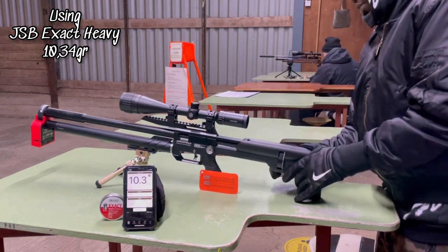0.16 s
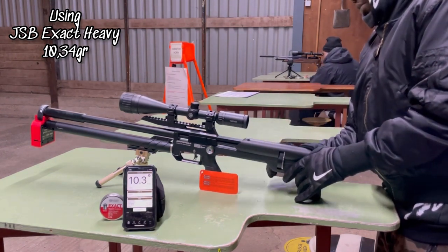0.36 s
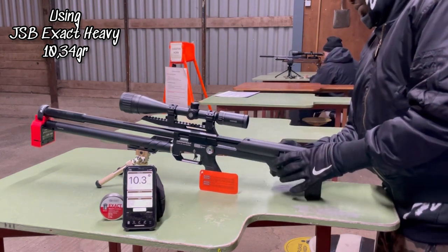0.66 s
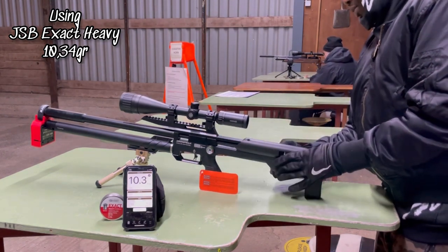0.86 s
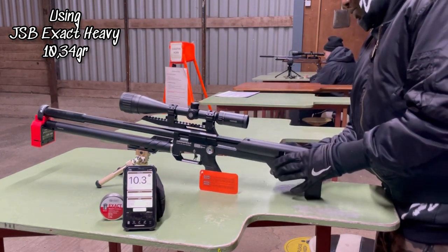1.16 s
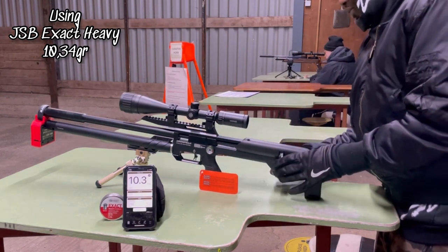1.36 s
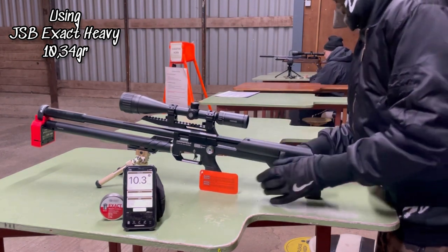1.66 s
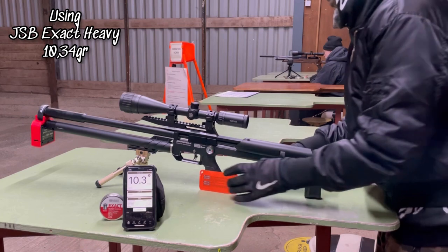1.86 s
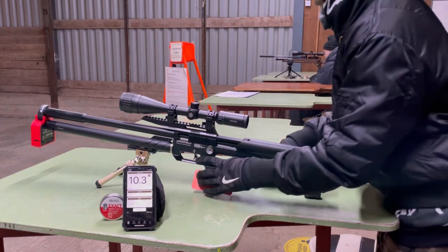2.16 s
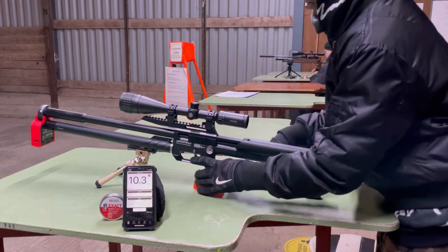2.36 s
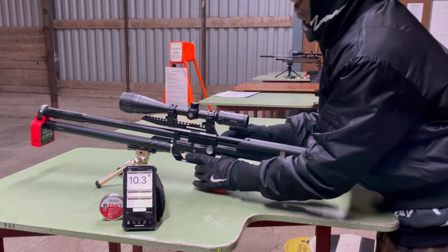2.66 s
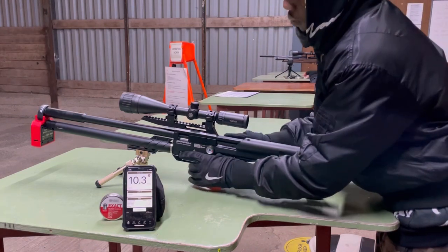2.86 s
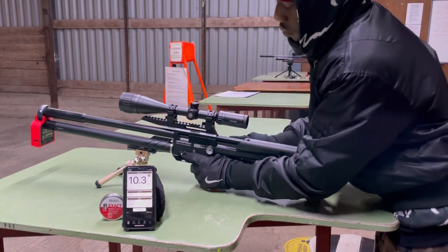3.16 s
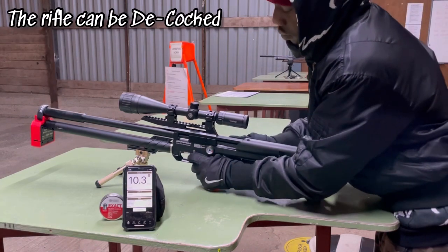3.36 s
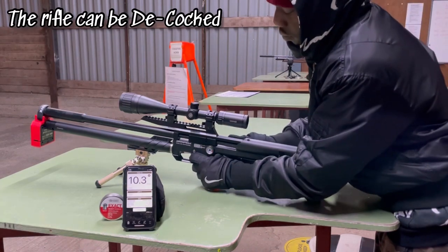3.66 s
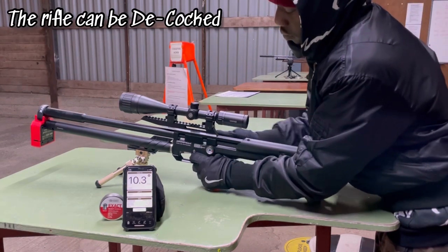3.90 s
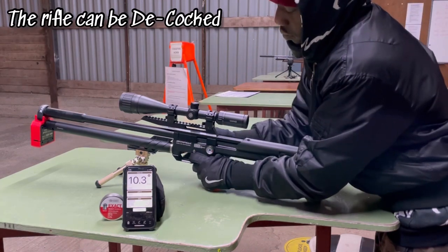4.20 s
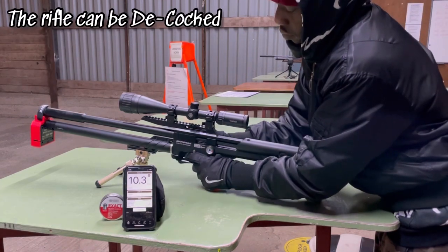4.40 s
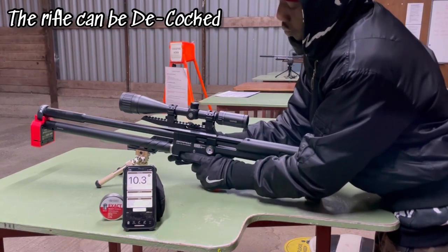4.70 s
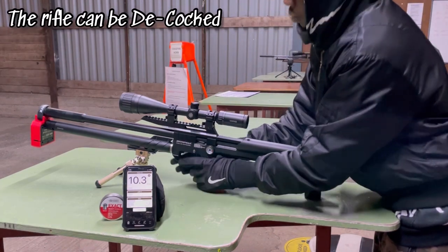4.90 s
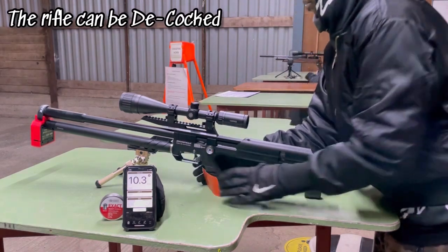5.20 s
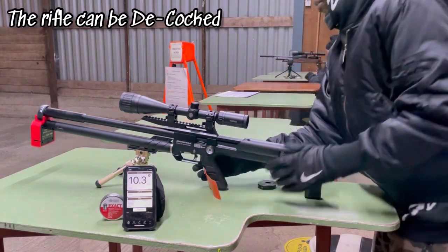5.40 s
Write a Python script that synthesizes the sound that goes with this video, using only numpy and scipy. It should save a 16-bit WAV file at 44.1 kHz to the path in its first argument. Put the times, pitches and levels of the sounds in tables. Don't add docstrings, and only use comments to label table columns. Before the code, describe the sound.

Close stereo recording at a bench in a large sheet-metal shed. Rifle parts click, knock and scrape quietly, then one far louder, bright, sharp bang cracks and rings through the hall. As its echo fades, cloth swishes and rustles, a tiny rubbery squeak slips by, and a few crisp metal knocks finish over a faint low rumble.

```python
import sys
import numpy as np
from scipy import signal
from scipy.fft import rfft, irfft, next_fast_len
from scipy.io import wavfile
from scipy.ndimage import uniform_filter1d

SR = 44100
rng = np.random.default_rng(int(sys.argv[2]) if len(sys.argv) > 2 else 0)


def int16_out(signal):
    q = np.round(np.clip(np.atleast_2d(signal).T, -1, 1) * 32767)
    wavfile.write(sys.argv[1], SR, q.astype(np.int16))


def convert_level_to_amplitude(level_db):
    exponent = np.asarray(level_db, float) / 20
    return 10 ** exponent


N = 244478

# frequency in Hz, level in dB.
STRIKE_COLOUR = [(150, -15.5), (400, -1.5), (1000, -1), (2000, 1.5), (4000, 8.5), (6500, -6.5), (9000, 1),
                 (13000, 10), (16000, -7)]


def at_hz(points, hz):
    freqs, values = np.array(points).T[:2]
    return np.interp(np.log(hz), np.log(freqs), values)


def rms_one(x):
    return x / np.sqrt(np.mean(x ** 2) + 1e-20)


def drift(rate, size=N):
    knots = rng.standard_normal(int(size / SR * 40) + 2)
    return np.interp(np.arange(size) / SR * rate, np.arange(len(knots)), knots)


def swells(rows):
    t = np.arange(0, N + 32, 32) / SR
    gain = 0
    for peak_s, db, rise_s, fall_s in rows:
        away = np.maximum((peak_s - t) / rise_s, (t - peak_s) / fall_s)
        gain = gain + convert_level_to_amplitude(db - 20 * away)
    return np.interp(np.arange(N) / SR, t, gain)


def coloured(spectrum, patchy_db, rate):
    size = next_fast_len(N)
    hz = np.maximum(np.arange(size // 2 + 1) * SR / size, 1)
    inside = (hz > spectrum[0][0]) & (hz < spectrum[-1][0])
    white = rfft(rng.standard_normal((2, size)))
    noise = irfft(white * convert_level_to_amplitude(at_hz(spectrum, hz)) * inside, size)[:, :N]
    return rms_one(noise * convert_level_to_amplitude(patchy_db * drift(rate)))


def blows(rows, strike, cycles, crack_s, spread_db, snap_db, pan_db, upper_db, upper_follows):
    near, send = np.zeros((2, N)), np.zeros(N)
    t = np.arange(2048) / SR
    grid = np.geomspace(160, 15500, 100)
    bins = np.maximum(np.arange(129) * SR / 256, 1)
    unlike_db = -7
    pan = (convert_level_to_amplitude(pan_db / 2) - convert_level_to_amplitude(-pan_db / 2)) / 2
    for s, peak_db, low_db, high_db, send_db in rows:
        at = round(s * SR)
        edge_db = upper_db + upper_follows * high_db
        tilt = [(550, low_db), (1100, 0), (2200, 0.0046), (3300, edge_db), (5000, edge_db), (7500, high_db)]
        hz = (grid * np.exp(rng.normal(0, .02, 100)))[:, None]
        decay = np.exp(np.float32(-np.log(1000) * t / (cycles / hz + crack_s)))
        ring = decay * (1 - np.exp(-t / .00015))
        scatter_db = spread_db * rng.standard_normal((2, 100, 1))
        strengths = convert_level_to_amplitude(at_hz(tilt, hz) + at_hz(strike, hz) + scatter_db)
        phase = 2 * np.pi * (hz * t + 0.59 * rng.random((2, 100, 1)))
        modes = strengths * ring * np.sin(np.float32(phase))
        shared, own = convert_level_to_amplitude(peak_db - 14) * modes.sum(axis=1)
        near[:, at:at + len(t)] += [shared, convert_level_to_amplitude(unlike_db) * own + pan * shared]
        spectrum = convert_level_to_amplitude(at_hz(tilt, bins) + at_hz(strike, bins)) / np.sqrt(bins / 2000 + .1)
        click = np.roll(irfft(spectrum), 128)
        near[0, at - 100:at + 156] += convert_level_to_amplitude(peak_db + snap_db) * click / np.abs(click).max()
        send[at:at + 256] += convert_level_to_amplitude(peak_db + send_db + 15) * click
    body = signal.butter(2, 260, "high", fs=SR, output="sos")
    return signal.sosfilt(body, near), send


def bang():
    # start in seconds, peak in dB, lows and highs in dB re peak, hall send in dB.
    shots = [
        (2.3016, -6.5, -16, 0, 2.5),
        (2.3053, -11, -22.5, -8, -30),
        (2.309, -16, -8, -12, -31),
        (2.5575, -29, -13, -17, -6),
    ]
    # frequency in Hz, level in dB.
    bang_colour = [(150, -6), (400, -4), (1000, -2.84), (2000, -0.6), (4000, -0.3), (6500, -10),
                   (9000, -7.5), (13000, 5.5), (16000, -17)]
    return blows(shots, bang_colour, cycles=6.2, crack_s=0.01, spread_db=1.0, snap_db=5.0,
                 pan_db=-4.5, upper_db=0.5, upper_follows=0.75)


def knocks():
    # start in seconds, peak in dB, lows and highs in dB re peak, hall send in dB.
    hits = [(0.2507, -28, -13.5, 4.5, -6), (0.2713, -35, -3.5, -3, 1.5), (0.8714, -43, -23, -20, 1),
            (0.8824, -47, -4, -36, -3), (1.5702, -31.5, -4, -8, 0.5), (1.5753, -41, -1.5, -43, 11.5),
            (1.7423, -53.5, 4, -33, 11.5), (1.7941, -45, -8, -30, -9), (3.2912, -42, 3, -10, -1.5),
            (4.579, -29, -12.5, 5.5, -1), (4.5839, -48, 4.5, -6, -0.5), (4.9172, -40, -4, -18, -13),
            (4.9226, -24, -8, -13, -4), (4.9305, -35.5, -2, -45, -12), (5.014, -35.5, -16.5, -28, -23.5),
            (5.0214, -38.5, -18, -31, 3.5), (5.0659, -45.5, -11.5, -28, -10.5)]
    return blows(hits, STRIKE_COLOUR, cycles=17.0, crack_s=0.0088, spread_db=3.5, snap_db=6,
                 pan_db=-3.0, upper_db=-5.0, upper_follows=0.46)


def ticks():
    # start in seconds, peak in dB, lows and highs in dB re peak, hall send in dB.
    taps = [(0.7083, -46.5, -28, -20, -3), (1.2141, -56, -13, -34, 16), (1.27, -52, -42, -17, -2),
            (1.4352, -65, 4, -1, 3), (1.4536, -58.5, -7, 5, -3), (1.4724, -58.5, -17, 0, -11),
            (1.4887, -60.5, -22, 5.5, 6.5), (1.5024, -66.5, -10, -8, -7), (3.1375, -45.5, -19.5, -22, 3),
            (3.7653, -55, -13.5, -11, -12), (3.7901, -54, -4.5, -27.5, 1), (4.0492, -63, 5, -22, -2),
            (4.0996, -52, -20, -13, -1), (4.1103, -58.5, -6, -14, 0), (4.8945, -53, -17.5, -22, 16),
            (5.3692, -56, -18, -3, 7.5)]
    return blows(taps, STRIKE_COLOUR, cycles=6.3, crack_s=0.017, spread_db=2.5, snap_db=-1,
                 pan_db=-4.0, upper_db=-4.0, upper_follows=.12)


def ringing():
    # start in seconds, peak in dB.
    struck = [
        (0.2507, -19.5),
        (1.569, -25),
        (2.302, -3.5),
        (4.5788, -13),
        (4.9226, -18.5),
    ]
    # frequency in Hz, level in dB, T60 in seconds.
    part_modes = [
        [(638, 13.5, 0.052), (1460, -8, 0.11), (2740, 5, 0.012), (3480, -30, 0.0033)],
        [(330, -4, 0.17), (1102, 5.5, 0.22), (1306, 2, 0.1), (5044, -36, 0.21), (6100, -13, 0.19)],
        [(1304, -9, 0.078), (2360, 5.5, 0.016), (3900, 2, 0.045), (5750, -15, 0.0061)],
        [(1920, -16.5, 0.019), (3140, -10, 5.0), (3630, 9, 0.016), (5210, -7, 0.006)],
        [(2000, -11, 0.09), (1424, -5, 0.056), (2686, -15, 0.048), (3510, -14, 0.043)],
    ]
    out, t = np.zeros(N), np.arange(4096) / SR
    for (s, peak_db), modes in zip(struck, part_modes):
        top_db = max(db for hz, db, t60 in modes)
        at = round(s * SR)
        for hz, db, t60 in modes:
            level_db = peak_db - 14.5 + db - top_db - 60 * t / np.clip(t60, .008, .09)
            out[at:at + len(t)] += convert_level_to_amplitude(level_db) * np.sin(2 * np.pi * hz * t)
    return out


def thump():
    # start in seconds, level in dB, frequency in Hz, T60 in seconds.
    booms = [
        (2.313, -38.5, 103.4, 0.21),
        (2.33, -46, 190.2, 0.25),
        (4.62, -44.5, 103.1, 0.22),
    ]
    out, t = np.zeros(N), np.arange(SR // 2) / SR
    for s, db, hz, t60 in booms:
        envelope = convert_level_to_amplitude(db - 60 * t / t60) * (1 - np.exp(-t / 0.011))
        out[round(s * SR):][:len(t)] += envelope * np.sin(2 * np.pi * hz * t)
    return out


def squeak():
    # time in seconds, pitch in Hz, level in dB.
    glide = [
        (3.785, 671, -70),
        (3.826, 640, -55.5),
        (3.855, 791, -55),
        (3.876, 793, -71),
        (3.9, 725, -71),
    ]
    # multiple of the pitch, level in dB.
    orders = [(1, -1.4), (2, -2.5), (3, -39), (4, -15)]
    s, pitch, level = np.transpose(glide)
    s = [s[0] - .015, *s, s[-1] + 0.013]
    t = np.arange(N) / SR
    hz = np.interp(t, s, [pitch[0], *pitch, pitch[-1]])
    level_db = np.interp(t, s, [-90, *level, -90])
    jitter, flutter = rms_one(uniform_filter1d(rng.standard_normal((2, N)), size=120))
    turns = np.cumsum(hz * (1 + .09 * jitter)) / SR
    wave = sum(convert_level_to_amplitude(db) * np.sin(2 * np.pi * k * turns) for k, db in orders)
    return convert_level_to_amplitude(level_db + 3.5 + 3.3 * flutter) * wave


def scrape(stroke, modes):
    size, out = 32768, np.zeros(N + 32768)
    catches_per_s = 980 * convert_level_to_amplitude(3.0 * drift(38, size))
    catches = rng.standard_normal(size) * (rng.random(size) < catches_per_s / SR)
    part = 0
    for hz, width_hz, db in modes:
        r = np.exp(-np.pi * (2.5 * width_hz + 260) / SR)
        zeros = [(1 - r * r) / 2, 0, (r * r - 1) / 2]
        poles = [1, -2 * r * np.cos(2 * np.pi * hz / SR), r * r]
        once = signal.lfilter(zeros, poles, catches)
        twice = signal.lfilter(zeros, poles, once)
        part = part + convert_level_to_amplitude(db) * (rms_one(twice) + .3 * rms_one(once))
    at = round(stroke[0][0] * SR) - size // 3
    out[at:at + size] = rms_one(part)
    return swells(stroke) * out[:N]


def scrapes():
    # peak in seconds, peak in dB, last 20 dB of rise and first
    # 20 dB of fall in seconds.
    strokes = [
        [(0.853, -62, 0.013, 0.027), (0.876, -53.5, 0.013, 0.022)],
        [(1.21, -62.5, .05, 0.069), (1.268, -51.5, 0.057, 0.07)],
        [(3.852, -57.5, .14, 0.078), (3.94, -61, .1, .11)],
        [(5.236, -56.5, .04, .1), (5.32, -64.5, .03, .06)],
    ]
    # frequency in Hz, width in Hz, level in dB.
    part_modes = [
        [(640, 22, -9.5), (1750, 67, -2.5), (2440, 32, -5), (3100, 55, -5.5), (4500, 130, -5.5)],
        [(1480, 49, 2), (1840, 16, 1.5), (1950, 47, 2.5), (2320, 110, 6.5), (3920, 52, -2.5), (4630, 39, -19)],
        [(1408, 47, 5), (2480, 32, -12.5), (3330, 200, -10), (4040, 200, -13)],
        [(1850, 55, 0), (2400, 250, 5), (3300, 250, 0), (3220, 53, -16), (4150, 47, -26.5)],
    ]
    return sum(scrape(stroke, modes) for stroke, modes in zip(strokes, part_modes))


def sleeve_swish():
    # peak in seconds, peak in dB, last 20 dB of rise and first 20 dB of fall in seconds.
    drags = [
        (2.79, -55, .008, 0.23),
        (2.94, -62, .3, 0.18),
    ]
    # frequency in Hz, level in dB per Hz.
    swish_colour = [(1200, -7), (2500, 1.5), (5000, -7.5), (8500, -3.2), (11000, -3.5), (13000, -9),
                    (15000, -19.5)]
    return swells(drags) * coloured(swish_colour, patchy_db=2.5, rate=25)


def jacket_rustle():
    # peak in seconds, peak in dB, last 20 dB of rise and first 20 dB of fall in seconds.
    moves = [(0.0, -78.5, .1, 0.17), (0.3, -79, .03, 0.68), (0.68, -90, 0.33, .05), (0.87, -80, .15, 0.045),
             (1.0, -69, 0.056, .4), (1.44, -73.5, .3, .25), (1.8, -74, 0.12, 0.44), (2.27, -73, .45, 0.95),
             (3.33, -79, .5, .14), (3.767, -72.5, 0.01, .03), (3.86, -75, .2, 0.42), (4.2, -83, .08, .2),
             (4.7, -72, .11, .15), (4.92, -69, 0.24, 0.28), (5.16, -72.5, 0.45, 0.39),
             (5.36, -76.5, .2, .3)]
    # frequency in Hz, level in dB per Hz.
    rustle_colour = [(2500, -5), (4000, -2.5), (6000, -6), (8000, -5), (10000, -3.5), (12000, -0.5),
                     (13500, 4.5), (15000, -14), (16300, -19.5)]
    return swells(moves) * coloured(rustle_colour, patchy_db=1.65, rate=36)


def weight_shuffle():
    # peak in seconds, peak in dB, last 20 dB of rise and first 20 dB of fall in seconds.
    shifts = [(0.0, -72, .1, 0.5), (0.42, -62, 0.08, 0.2), (1.08, -64.5, 0.78, 0.6),
              (1.73, -60.5, 0.1, 0.22), (2.28, -66.5, 0.68, 2), (3.1, -65.5, 2.2, 0.3),
              (3.98, -68.5, 0, .42), (4.62, -68, .03, 0.1), (5.14, -67.5, .6, 1.3)]
    # frequency in Hz, level in dB per Hz.
    shuffle_colour = [(150, -28.5), (250, -3.5), (403, -3), (449, 0), (1090, -0.5), (1450, -9.5),
                      (2270, -5), (6000, -34), (7800, -61), (13200, -120)]
    return swells(shifts) * coloured(shuffle_colour, patchy_db=0.4, rate=9.1)


def bands(size):
    edges = 25 * 2 ** (np.arange(29) / 3)
    white = rng.standard_normal((2, 2, size))
    for k, (low, high) in enumerate(zip(edges, edges[1:])):
        third = signal.butter(2, [low, high], "band", fs=SR, output="sos")
        yield np.sqrt(low * high), signal.sosfilt(third, white[k % 2])


def hall(send):
    # frequency in Hz, T60 in seconds.
    hall_t60 = [(100, .5), (250, 3.6), (700, 3.82), (1500, 2.8), (3000, 1.96), (5500, 1.2), (8000, 0.83),
                (13000, 0.4)]
    # frequency in Hz, level in dB.
    hall_colour = [(100, 3), (300, 9), (1000, -0.6), (3000, -0.5), (7000, 0.5), (13000, -6.5)]
    hall_db, early_db, early_t60_s = -16.5, 6.5, 0.68
    t = np.arange(2 * SR) / SR
    echoes = 0
    for hz, band in bands(len(t)):
        clumps_db = 1.5 * drift(36, len(t))
        decay_db = at_hz(hall_colour, hz) - 60 * t / at_hz(hall_t60, hz)
        echoes = echoes + convert_level_to_amplitude(decay_db + clumps_db) * band
    echoes = echoes * (1 + convert_level_to_amplitude(early_db - 60 * t / early_t60_s))
    echoes = echoes * np.clip(t / 0.0024, 0, 1)
    return convert_level_to_amplitude(hall_db - 21) * signal.fftconvolve(send[None], echoes, axes=1)[:, :N]


def rumble():
    # frequency in Hz, level in dB per Hz.
    rumble_colour = [(15, -45.5), (25, -46.5), (43, 9.5), (99, 5.5), (309, -11.5), (531, -18), (641, -16.5),
                     (754, -40.5), (1070, -18.5), (1290, -45), (1610, -41), (1740, -42.5), (3820, -59),
                     (14000, -41.5), (16000, -67)]
    return convert_level_to_amplitude(-60) * coloured(rumble_colour, patchy_db=2.5, rate=20)


def scene():
    parts = [bang(), knocks(), ticks()]
    rubbing = squeak() + scrapes()
    out = sum(near for near, send in parts)
    out = out + (rubbing + thump() + ringing()) * [[1], [.4]]
    out = out + hall(sum(send for near, send in parts) + convert_level_to_amplitude(-12) * rubbing)
    return out + sleeve_swish() + jacket_rustle() + weight_shuffle() + rumble()


def roll_off(x):
    return signal.sosfilt(signal.butter(12, 16720, fs=SR, output="sos"), x)


def record(dry):
    # frequency in Hz, level in dB.
    unlike = [(60, -17), (200, -9), (400, -4.5), (800, 1), (1500, -0.4), (3000, -3.5), (6000, -1),
              (8000, -8.5), (9500, -16), (11000, -7), (14000, -13.5)]
    # frequency in Hz, phase in rad.
    port_phase = [(1800, 0), (3500, .8), (4800, .7), (6200, -1.3), (7600, -2.7), (8800, -3.14),
                  (10300, -3.9), (11000, -4.6), (11800, -5.6), (13000, -6.28)]
    # frequency in Hz, level in dB.
    port_lift = [(4000, -0.07), (8000, 6.5), (13000, -3.5), (16000, -13)]
    # frequency in Hz, level in dB.
    left_db = [(100, 0.7), (2000, 1.5), (4500, 2.5), (7500, 1.93)]
    cutoff_hz = 16500
    size = next_fast_len(N + 4096)
    hz = np.maximum(np.arange(size // 2 + 1) * SR / size, 1)
    shared, own = rfft(dry, size) * convert_level_to_amplitude(at_hz(port_lift, hz)) * (hz < cutoff_hz)
    own = own * convert_level_to_amplitude(at_hz(unlike, hz))
    turn = np.exp(.5j * at_hz(port_phase, hz)) * convert_level_to_amplitude(at_hz(left_db, hz) / 2)
    ports = irfft([(shared + own) * turn, (shared - own) / turn], size)[:, :N]
    return roll_off(ports)


dry = scene()
out = record(dry)
int16_out(out)
```